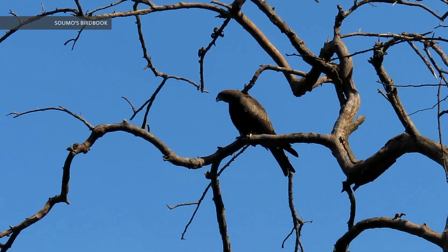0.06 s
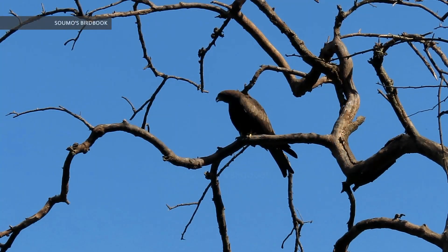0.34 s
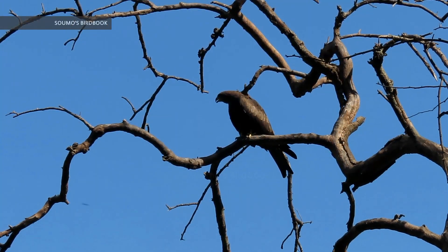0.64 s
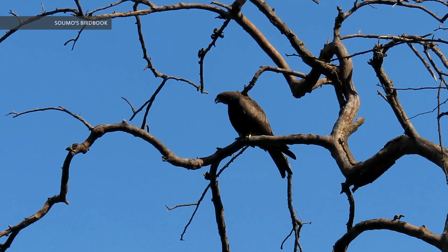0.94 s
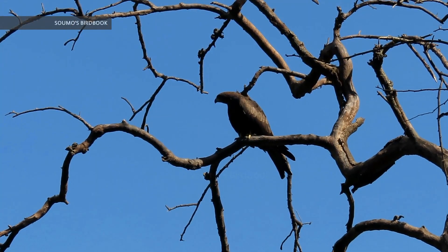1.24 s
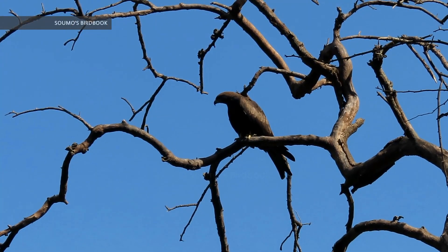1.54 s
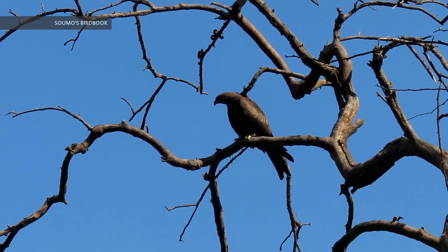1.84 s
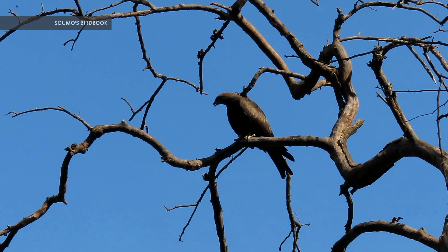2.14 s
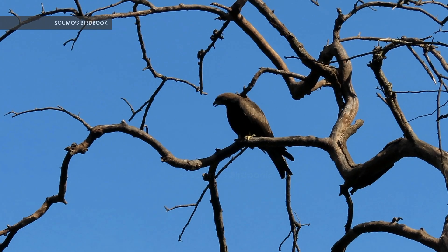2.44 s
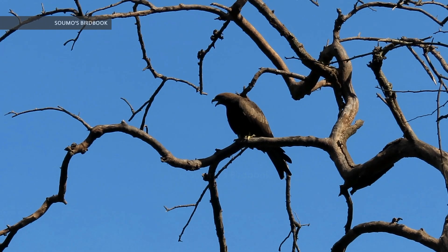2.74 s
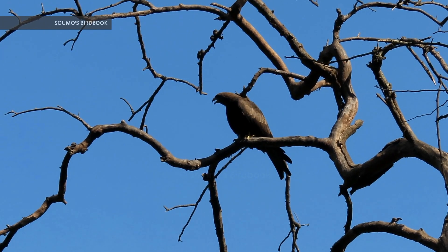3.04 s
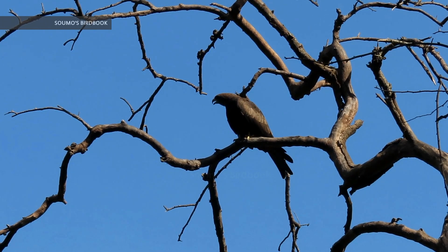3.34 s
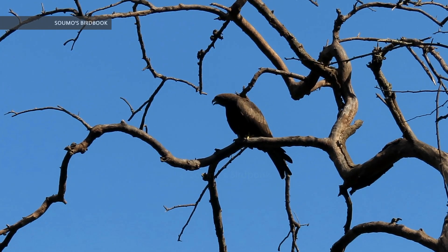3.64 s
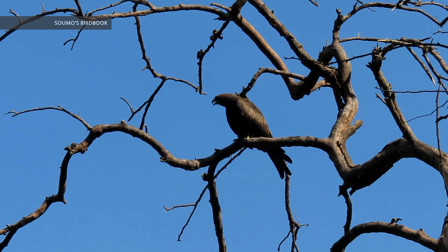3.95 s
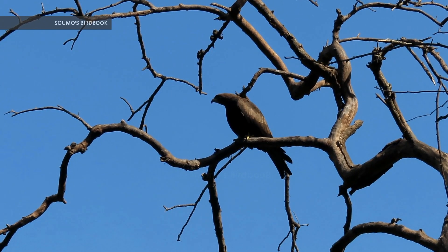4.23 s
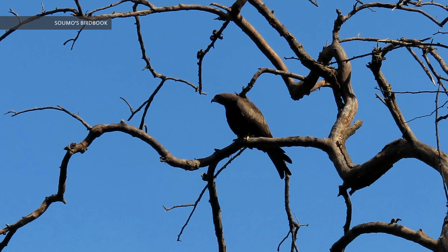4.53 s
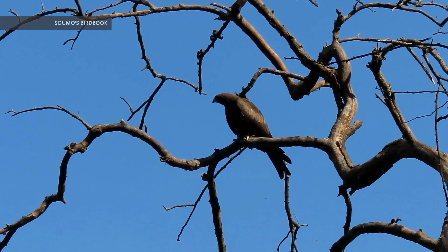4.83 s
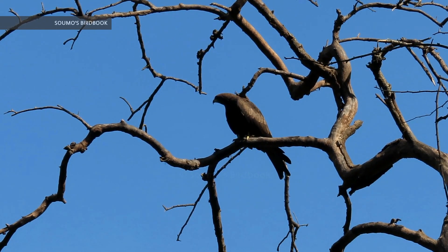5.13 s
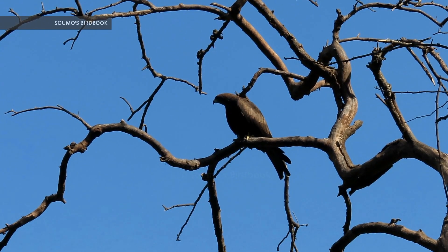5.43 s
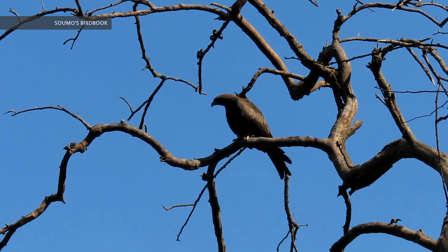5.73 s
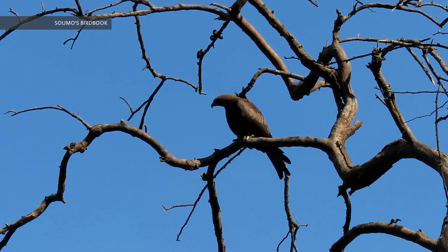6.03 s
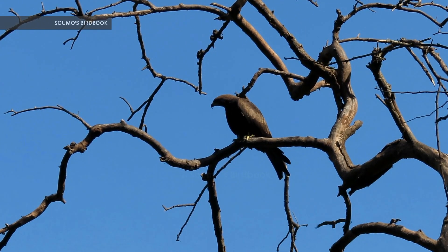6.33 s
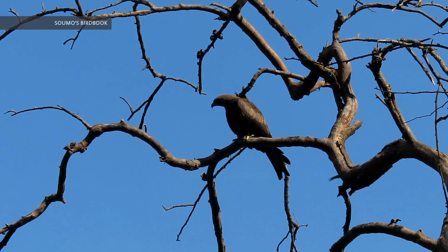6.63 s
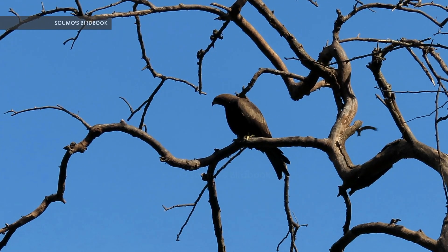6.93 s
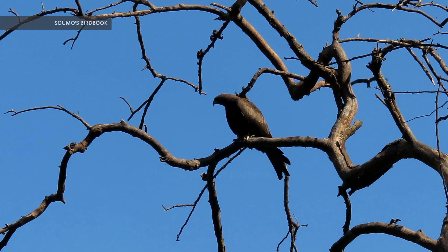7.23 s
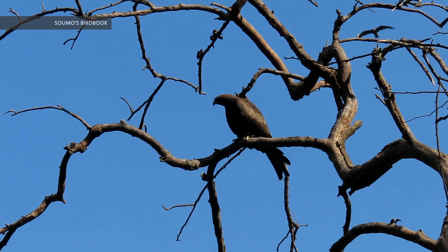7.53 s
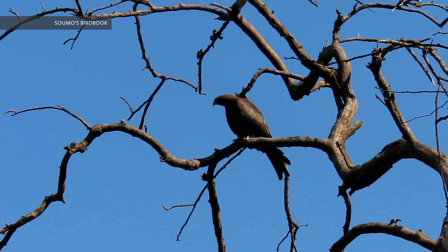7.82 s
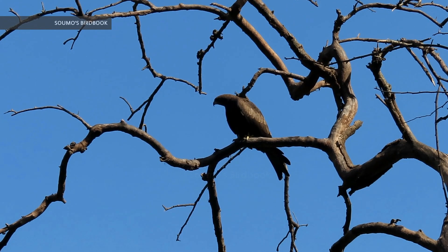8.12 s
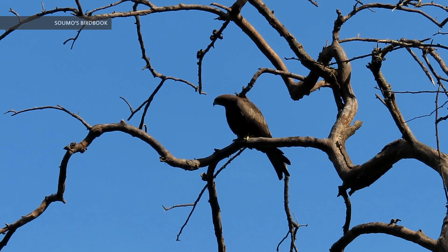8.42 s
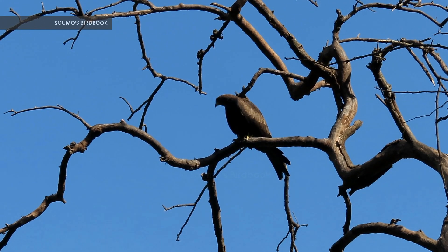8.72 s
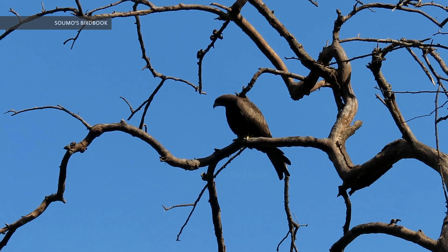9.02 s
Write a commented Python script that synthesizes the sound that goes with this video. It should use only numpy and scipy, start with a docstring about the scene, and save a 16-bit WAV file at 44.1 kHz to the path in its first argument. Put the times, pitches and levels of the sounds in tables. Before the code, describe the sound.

A large bird gives two long falling whistles that turn hoarse, then another bird squawks three times over a low distant engine rumble.

```python
"""Kite whistles and squawks among trees.

A kite on a bare tree gives two long falling whistles; each breaks register into a hoarse quaver.
A parrot-like bird then squawks three times close by: rough harmonics through a fixed throat.
The trees throw the calls back. Behind: faint far birds, distant engines beating against each other,
the thin, high whine of a small motor and a soft outdoor wash."""
import sys
import numpy as np
from scipy import signal
from scipy.fft import rfft, irfft, next_fast_len
from scipy.io import wavfile

SR = 44100
rng = np.random.default_rng(int(sys.argv[2]) if len(sys.argv) > 2 else 0)


def output_pcm(signal):
    """Save a mono or channel-first signal as 16-bit PCM at the path in sys.argv[1].

    Samples are clipped to [-1, 1] before scaling.
    """
    pcm = np.clip(np.atleast_2d(signal).T, -1, 1) * 32767
    wavfile.write(sys.argv[1], SR, np.round(pcm).astype(np.int16))


N = 399987
TIME = np.arange(N) / SR

# clear part, one table per whistle: (time [s], pitch [Hz], level [dB])
KITE_CLEAR = [
    [(0.0, 2440, -40.5), (0.07, 2417, -39), (0.088, 2415, -35.5), (0.292, 2413, -35.5), (0.406, 2430, -41),
     (0.522, 2396, -36), (0.538, 2356, -38.5), (0.672, 2378, -36.5), (0.712, 2404, -37), (0.754, 2340, -36)],
    [(2.83, 2610, -19), (2.855, 2613, -16.5), (2.885, 2540, -24.5), (2.926, 2502, -28.5),
     (3.034, 2292, -23.5), (3.108, 2237, -28.5), (3.12, 2224, -31.5), (3.306, 2180, -32),
     (3.336, 2178, -36.5), (3.416, 2117, -33.5), (3.576, 2035, -33.5), (3.772, 1974, -37.5)],
]
# whistle onsets: (scoop [s], held 2nd harmonic [dB], its accent [dB], 3rd re 2nd [dB])
KITE_OPENINGS = [(.002, -73, -2, -20), (.068, -69, 26.5, -15)]
# after the register break: (end [s], pitch [Hz], sag [Hz/s], level [dB], fade [dB/s],
# 2nd harmonic [dB], strain onset [s], last crest [s])
KITE_QUAVERS = [(1.2, 1953, 530, -43, -7, -61.5, 0.78, 1.125),
                (4.215, 1881, 7.5, -43, -1.5, -56.5, 3.5, 4.122)]
# brief dips in the whistle's loudness: (time [s], half length [s], gain [dB])
WHISTLE_DIPS = [(0.789, 0.0055, -7), (0.928, 0.0048, -11), (1.02, .015, -18), (1.075, 0.02, -10),
                (1.11, 0.0074, -10), (1.165, 0.011, -14), (2.798, 0.0069, -12), (2.922, 0.0087, -6),
                (3.343, 0.018, -19), (3.385, 0.0082, -21), (3.666, 0.0058, -6), (3.725, 0.011, -10),
                (3.767, 0.0057, 3), (3.84, 0.0054, -2), (4.005, 0.0081, -8), (4.085, 0.0067, -5)]
# faint rough hiss just before the second whistle; upward cracks in its quaver:
# (time [s], length [s], from [Hz], to [Hz], level [dB], pitch jitter [ratio])
ROUGH_GLIDES = [(2.745, 0.026, 1840, 2150, -50, .16), (2.748, 0.03, 2930, 3270, -55, .07),
                (4.007, 0.0258, 1890, 2450, -45.5, 0.034), (4.087, 0.029, 2024, 2490, -55, 0.026)]
# one table per squawk: (time [s], pitch [Hz], level [dB], roughness [0-1], treble [dB])
SQUAWKS = [
    [(7.398, 850, -33, .8, 2), (7.402, 994, -29, .75, 5), (7.408, 1050, -39, .8, 2),
     (7.415, 1626, -23.5, .5, 4), (7.419, 1915, -23, 0.26, 4), (7.422, 2380, -28, 0.3, 2),
     (7.425, 3510, -38, .05, 0), (7.43, 3610, -13.5, 0, -1), (7.443, 3540, -19.5, 0.07, 5),
     (7.454, 3240, -26.5, 0.13, 4), (7.471, 3067, -25, 0, -6), (7.472, 2450, -35, .2, -4),
     (7.479, 2373, -20, 0.16, -7), (7.499, 2242, -20, 0, -2), (7.515, 2184, -26.5, 0.13, -2),
     (7.541, 2120, -24.5, 0.12, 3), (7.562, 1844, -21, .04, -0.5), (7.584, 1490, -40, .5, -3)],
    [(7.994, 755, -41, .6, 5), (8.003, 1187, -36, .7, 0), (8.011, 1810, -26.5, 0.4, -3),
     (8.018, 2400, -27, .45, -6), (8.028, 2483, -32, .2, -8), (8.037, 2377, -22, 0, -6),
     (8.052, 2096, -22, 0, 4), (8.064, 2078, -21.5, 0.11, 6), (8.079, 2085, -24, 0, 5.5),
     (8.098, 1888, -20.5, 0.03, 6), (8.125, 1806, -18, 0.07, -2.5), (8.142, 1606, -31.5, 0, 0),
     (8.157, 1410, -41, 0.4, 0)],
    [(8.491, 760, -38, .5, 0), (8.5, 1170, -38.5, .7, 0), (8.508, 1820, -27, 0.3, -2),
     (8.514, 2365, -26, 0.4, -6), (8.523, 2487, -34, 0.3, -8), (8.533, 2390, -21.5, 0.07, -8),
     (8.552, 2024, -20, 0.04, 3), (8.574, 2018, -20.5, 0.05, 7), (8.591, 1838, -16.5, 0, 1),
     (8.606, 1813, -21, 0, -2), (8.62, 1744, -22, 0, -3), (8.633, 1616, -28.5, 0.1, -3),
     (8.65, 1400, -40, .5, 0)],
]
# squawker's throat response: (frequency [Hz], gain [dB])
THROAT_RESPONSE = [(700, -1), (1400, 0), (1650, -13.5), (1850, -9), (2100, -6), (2400, -5.5), (3000, 1),
                   (3600, 7.5), (4300, 6.5), (5000, 0), (5500, -3.5), (5900, -6), (6300, -20),
                   (6700, -13.5), (7150, -9.5), (7800, -24), (8400, -14), (9200, -17.5), (10200, -25),
                   (11200, -18.5), (12500, -29), (14500, -29), (16000, -27)]
# far birds: (time [s], length [s], from [Hz], to [Hz], level [dB], pitch jitter [ratio])
FAR_BIRDS = [(0, 0.042, 4140, 4180, -56, 0.093), (0, 0.29, 4400, 4520, -72, 0.028),
             (.642, 0.13, 3520, 3510, -63, 0.038), (6.737, 0.2, 3540, 3690, -69, 0.025),
             (7.15, 0.27, 716, 655, -54, 0.11), (7.173, 0.33, 1444, 1354, -57, 0.21)]
# scatter from the trees: (frequency [Hz], T60 [s], relative level [dB])
TREE_TAIL = [(1000, 0.4, -12), (2340, 0.89, 0.5), (3060, 0.67, 1), (4060, 0.83, 5.5), (4380, 0.7, 7),
             (4830, 0.67, 2.5), (5530, 0.6, 7.5), (6500, 0.53, 7.5), (8140, 0.52, 6), (14000, 0.21, 1)]
# reflections off branches and ground, per kind of sound: (delay [s], gain [dB])
TONE_ECHOES = [(.0147, -31), (0.03, -25.5), (.074, -18.5)]
OVERTONE_ECHOES = [(.0147, -20), (.074, -6.5), (.092, -13)]
SQUAWK_ECHOES = [(.0083, -8.5), (.0147, -8.5), (.03, -12), (.072, -18), (.108, -22.5)]
# phase between the two microphones: (frequency [Hz], left re right [rad])
MIC_PHASE = [(2500, 0), (4100, -0.26), (5000, 0.53), (6000, -0.83), (6900, .4), (8700, 0.93), (10200, 1.7),
             (12000, -0.072), (15500, 2.1)]
# strength of each beating engine tone: (time [s], rms level [dB])
ENGINE_THROB = [(0, -36), (1.2, -32), (2.3, -34.5), (3.4, -44), (4.1, -31), (5.3, -29), (6.8, -32),
                (7.6, -34), (8.3, -28.5), (9.07, -27.5)]
# weaker engine tones: (frequency [Hz], rms level [dB])
ENGINE_DRONE = [(24.6, -43.5), (45.1, -39), (70.5, -40), (75, -43.5), (78.7, -40), (118, -49), (120.8, -44),
                (150, -60.5), (173, -52), (216, -58.5)]
# motor speed, briefly rising: (time [s], pulse rate [Hz])
MOTOR_RATE = [(0, 395.8), (2.3, 395.8), (2.9, 399.2), (3.8, 401.2), (4.2, 397.8), (5.2, 396)]
# motor lines: (multiple of pulse rate, relative level [dB])
MOTOR_LINES = [(20, -13), (21, -13), (22, -11), (23, -5), (24, -2), (25, 0), (26, -6), (27, -9), (28, -13),
               (29, -16)]
# sidebands of each line: (offset [Hz], relative level [dB])
MOTOR_SIDEBANDS = [(-96.5, -11), (-48, 1), (47, -8)]
# background spectra: (frequency [Hz], relative density [dB])
RUMBLE_SHAPE = [(10, -43), (25, 1), (45, 2.5), (90, 7), (115, -2.5), (150, -6.5), (250, -32), (600, -89)]
WASH_SHAPE = [(82, -39), (140, -3.5), (169, -4), (276, -6.5), (310, -5.5), (349, -8), (387, -7), (590, -14),
              (814, -14.5), (886, -16.5), (1380, -23), (1630, -27.5), (3730, -32.5), (6420, -38.5),
              (8000, -40), (10400, -93), (17600, -120)]
HISS_SHAPE = [(4000, -42), (7000, -20), (8600, -5.5), (9800, 2.5), (11000, -9.5), (12200, -10),
              (15500, -42)]
# narrow background bands: (centre [Hz], width [Hz], rms level [dB])
NOISE_BANDS = [(809.3, 25.6, -54), (1356, 14, -67)]
# left-right likeness of the background: (frequency [Hz], correlation before clipping [ratio])
STEREO_LIKENESS = [(60, 1), (130, 1), (300, 0.82), (700, 0.92), (1400, 0.63), (3100, 0.33), (7000, 0.35),
                   (15000, -1.33)]


def kite():
    """Two whistles. The bird faces sideways, so more of its overtones arrive via the trees."""
    tone, overtones = np.zeros((2, N))
    for call in zip(KITE_CLEAR, KITE_OPENINGS, KITE_QUAVERS):
        start_s, (low, high) = whistle(*call)
        add(tone, start_s, low)
        add(overtones, start_s, high)
    return trees(tone, TONE_ECHOES, wet_db=-13.5) + trees(overtones, OVERTONE_ECHOES, wet_db=-8.5)


def whistle(clear, opening, quavering, quaver_hz=13.6, depth_hz=78, side_ratio=1.445, side_db=-8.5):
    """Near-pure tone and overtones; strain adds hoarseness, a quaver and a second voice in its troughs."""
    t, hz, tone_db, second_db, strain = whistle_contour(clear, opening, quavering)
    break_s, crest_s, third_db = clear[-1][0], quavering[-1], opening[-1]
    quaver = np.cos(2 * np.pi * quaver_hz * (t - crest_s) + .2 * wander(t, 8))
    jitter = 1 + .0024 * wander(t, 77) + .0071 * strain * wander(t, 270)
    phase = phase_of((hz + depth_hz * strain ** 2 * quaver) * jitter)
    troughs = ramp(t, break_s, .085) * strain * (1 - quaver) / 2
    side_gain = troughs * gain_of(side_db + 3 * wander(t, 30))
    side_phase = phase_of(side_ratio * hz * (jitter + .022 * wander(t, 470)))
    tone = gain_of(tone_db) * (np.sin(phase) + side_gain * np.sin(side_phase))
    accent = gain_of(second_db - second_db.max())
    raspy_phase = phase + (.05 + .15 * accent * (1 - strain)) * wander(t, 200)
    overtones = np.sin(2 * raspy_phase) + gain_of(third_db) * np.sin(3 * raspy_phase)
    overtones *= gain_of(second_db + 3.5 * wander(t, 110))
    flutter_db = (3.5 * np.sqrt(strain) - 1.2) * wander(t, 55) + 1.5 * strain * quaver
    envelope = gain_of(flutter_db) * signal.windows.tukey(len(t), .015)
    return t[0], np.sqrt(2) * np.array([tone, overtones]) * envelope


def whistle_contour(clear, opening, quavering, scoop_hz=464, scoop_db=-20.5, accent_s=.37, harsh_db=11.5,
                    jump_s=.0024, strain_rise_s=.261, release_s=.087, release_db=-21):
    """Pitch, levels and strain: scoop up, clear fall, break to a lower register, fade."""
    scoop_s, held_db, accent_db, _ = opening
    end_s, low_hz, sag_hz_per_s, low_db, fade_db_per_s, low_second_db, strain_s, _ = quavering
    top_s, break_s = clear[0][0], clear[-1][0]
    t = span(top_s - scoop_s, end_s)
    scoop = (1 - ramp(t, top_s - scoop_s, scoop_s)) ** 2
    broken, strain = ramp(t, break_s, jump_s), ramp(t, strain_s, strain_rise_s)
    hz, db = curves(clear, t)
    second_db = held_db + accent_db * np.exp(-((t - t[0]) / accent_s) ** 2) + harsh_db * strain ** .89
    high = (hz - scoop_hz * scoop, db + scoop_db * scoop, second_db + scoop_db * scoop ** 2 / 2)
    low = (low_hz - sag_hz_per_s * (t - break_s), low_db + fade_db_per_s * (t - break_s), low_second_db)
    hz, tone_db, second_db = [a + broken * (b - a) for a, b in zip(high, low)]
    dips_db = sum(dip_db * np.exp(-((t - s) / half_s) ** 2) for s, half_s, dip_db in WHISTLE_DIPS)
    fade_db = release_db * ramp(t, end_s - release_s, release_s)
    return t, hz, tone_db + dips_db + fade_db, second_db + fade_db, strain


def squawker():
    """The bird is on the move, so each squawk scatters differently through the trees."""
    out = np.zeros((2, N))
    for rows in SQUAWKS:
        t = span(rows[0][0], rows[-1][0])
        cry = np.zeros(N)
        add(cry, t[0], squawk(t, *curves(rows, t)))
        out += trees(cry, SQUAWK_ECHOES, wet_db=-10.5, spread=.4)
    return out


def squawk(t, hz, level_db, rough, treble_db, rasp_db=-4, growl_db=5, dull_db=5, split=.36, rattle=.14):
    """Harmonics through a fixed throat; roughness adds jitter, growl, rasp and strong-weak cycles."""
    phase = phase_of(hz * (1 + (.0038 + .039 * rough) * wander(t, 670) + .0035 * wander(t, 66)))
    orders = np.arange(2, 21)[:, None] / 2  # half orders split the cycles
    partial_hz = orders * hz
    tilt_db = growl_db * (1 - ramp(partial_hz, 1200, 1600)) - dull_db * ramp(partial_hz, 4500, 4500)
    colour_db = at_hz(THROAT_RESPONSE, partial_hz) + treble_db * ramp(partial_hz, 5500, 3200)
    waver_db = 3.5 * np.array([wander(t, 29) for _ in orders])
    gains = gain_of(colour_db + rough * tilt_db + waver_db) * (partial_hz < SR / 2)
    gains *= np.where(orders % 1, split * rough, 1)
    voice = (gains * np.sin(orders * phase)).sum(0) / np.sqrt((gains ** 2).sum(0) / 2)
    voice *= 1 + rattle * wander(t, 350)  # uneven cycles widen each line
    turbulence = rfft(rng.standard_normal(len(t)) * (1 + np.cos(phase)))
    throat = gain_of(at_hz(THROAT_RESPONSE, np.fft.rfftfreq(len(t), 1 / SR)))
    rasp = unit_rms(irfft(turbulence * throat, len(t)))
    cry = np.sqrt(1 - rough ** 2) * voice + gain_of(rasp_db) * rough * rasp
    return cry * gain_of(level_db + 1.5 * wander(t, 110)) * signal.windows.tukey(len(t), .02)


def hoarse_glides():
    """Faint hiss, cracks in the quaver and far birds: short sine glides with fast pitch jitter."""
    out = np.zeros(N)
    for start_s, length_s, from_hz, to_hz, db, jitter in ROUGH_GLIDES + FAR_BIRDS:
        t = np.arange(0, length_s, 1 / SR)
        hz = np.linspace(from_hz, to_hz, len(t)) * (1 + jitter * wander(t, 890))
        envelope = np.sqrt(2) * gain_of(db) * signal.windows.tukey(len(t), .5)
        add(out, start_s, envelope * np.sin(phase_of(hz)))
    return trees(out, TONE_ECHOES, wet_db=-2, spread=.34)


def trees(x, echoes, wet_db, spread=.35, clump_db=1.5, build_s=.001):
    """Direct sound, a few dulled reflections and a clumpy scattered tail that decays by band."""
    t = TIME[:SR]
    hz, age_s, noise = signal.stft(rng.standard_normal((2, SR)), SR, nperseg=256)
    bands = np.array(TREE_TAIL)
    t60_s = at_hz(bands[:, :2], hz)[:, None]
    colour_db = at_hz(bands[:, [0, 2]], hz)[:, None]
    tail = signal.istft(noise * gain_of(colour_db - 60 * age_s / t60_s), SR, nperseg=256)[1][:, :SR]
    mid, side = tail * (1 - np.exp(-t / build_s)) * gain_of(clump_db * wander(t, 53))
    response = gain_of(wet_db) * np.array([mid + spread * side, mid - spread * side])
    response /= np.linalg.norm(mid)
    for delay_s, db in echoes:
        response[:, round(delay_s * SR) + np.arange(3)] += gain_of(db) * np.array([1, 4, 1]) / 6
    response[:, 0] += 1
    return signal.fftconvolve(x[None], response, axes=1)[:, :N]


def microphones(x):
    """Treble reaches the two microphones out of step."""
    size = next_fast_len(N + 4096)
    half_rad = at_hz(MIC_PHASE, np.fft.rfftfreq(size, 1 / SR)) / 2
    return irfft(rfft(x, size) * np.exp(1j * np.array([half_rad, -half_rad])), size)[:, :N]


def engines(engine_hz=59, beat_hz=1.39, drift_rad=.41):
    """Two distant engines beat in and out of step over weaker, wavering tones."""
    phase = 2 * np.pi * engine_hz * TIME + drift_rad * wander(TIME, 1.7)
    pair = np.sin(phase) - np.sin(phase + 2 * np.pi * beat_hz * TIME)
    drone = sum(gain_of(db) * np.sin(2 * np.pi * (hz * TIME + rng.random()) + .6 * wander(TIME, .65))
                for hz, db in ENGINE_DRONE)
    return np.sqrt(2) * (gain_of(curves(ENGINE_THROB, TIME)[0]) * pair + drone)


def motor_whine(level_db=-64, sideband_db=-3, drift_rad=.6, flicker=.5):
    """Small motor: high multiples of one pulse rate, each flickering, with weaker sidebands."""
    phase = phase_of(curves(MOTOR_RATE, TIME)[0])
    cluster, lines = 1, 0
    for hz, db in MOTOR_SIDEBANDS:
        side_phase = 2 * np.pi * hz * TIME + drift_rad * wander(TIME, 6.5)
        cluster += gain_of(sideband_db + db) * np.exp(1j * side_phase)
    for order, db in MOTOR_LINES:
        gain = gain_of(db) * (1 + flicker * wander(TIME, 9.8))
        line_phase = order * phase + 2 * np.pi * rng.random() + drift_rad * wander(TIME, 12)
        lines += gain * np.exp(1j * line_phase)
    quadrature = np.exp(1j * np.pi / 4 * np.array([[1], [-1]]))  # channels 90 degrees apart
    return gain_of(level_db) * unit_rms((quadrature * cluster * lines).real)


def background(rumble_db=-36, wash_db=-41.5, hiss_db=-56.5):
    """Low rumble, distant wash, high hiss and two steady narrow bands."""
    def band_shape(hz):
        return np.sqrt(sum(gain_of(db) ** 2 / width_hz / (1 + ((hz - centre_hz) / width_hz) ** 2) ** 2
                           for centre_hz, width_hz, db in NOISE_BANDS))

    layers = [(RUMBLE_SHAPE, rumble_db), (WASH_SHAPE, wash_db), (HISS_SHAPE, hiss_db)]
    broad = sum(gain_of(db) * stereo_noise(lambda hz: gain_of(at_hz(shape, hz))) for shape, db in layers)
    bands_rms = np.linalg.norm(gain_of(np.array(NOISE_BANDS)[:, 2]))
    return broad + bands_rms * stereo_noise(band_shape)


def stereo_noise(magnitude):
    """Unit-rms noise shaped by magnitude(Hz); channels alike in the bass, apart in the treble."""
    size = next_fast_len(N)
    hz = np.fft.rfftfreq(size, 1 / SR)
    a, b = rfft(rng.standard_normal((2, size)))
    correlation = np.clip(at_hz(STEREO_LIKENESS, hz), -.99, .99)
    mid, side = a * np.sqrt(1 + correlation), b * np.sqrt(1 - correlation)
    return unit_rms(irfft(np.array([mid + side, mid - side]) * magnitude(hz), size)[:, :N])


def wander(t, cutoff_hz):
    """Low-passed noise, unit rms."""
    size = next_fast_len(len(t))
    hz = np.fft.rfftfreq(size, 1 / SR)
    spectrum = rfft(rng.standard_normal(size)) / (1 + (hz / cutoff_hz) ** 4)
    return unit_rms(irfft(spectrum, size)[:len(t)])


def gain_of(db):
    return 10 ** (np.asarray(db) / 20)


def unit_rms(x):
    return x / np.sqrt(np.mean(x ** 2) + 1e-20)


def phase_of(hz):
    return 2 * np.pi * np.cumsum(hz) / SR


def ramp(x, start, length):
    return np.clip((x - start) / length, 0, 1)


def at_hz(points, hz):
    """Interpolate (frequency [Hz], value) on a log axis."""
    knots_hz, values = np.transpose(points)
    return np.interp(np.log(hz + 1), np.log(knots_hz + 1), values)


def curves(rows, t):
    """Each column of a timed table at times t."""
    knots_s, *columns = np.transpose(rows)
    return [np.interp(t, knots_s, column) for column in columns]


def span(start_s, end_s):
    return TIME[(TIME >= start_s) & (TIME <= end_s)]


def add(mix, start_s, sound):
    part = mix[round(start_s * SR):][:len(sound)]
    part += sound[:len(part)]


def scene():
    """Birds among the trees, over engines, motor and background."""
    birds = kite() + squawker() + hoarse_glides()
    return microphones(birds) + engines() + motor_whine() + background()


def record(dry):
    """Low-pass at 15.8 kHz."""
    return signal.oaconvolve(dry, signal.firwin(511, 15800, window=("kaiser", 9), fs=SR)[None], "same")


dry = scene()
out = record(dry)
output_pcm(out)
```